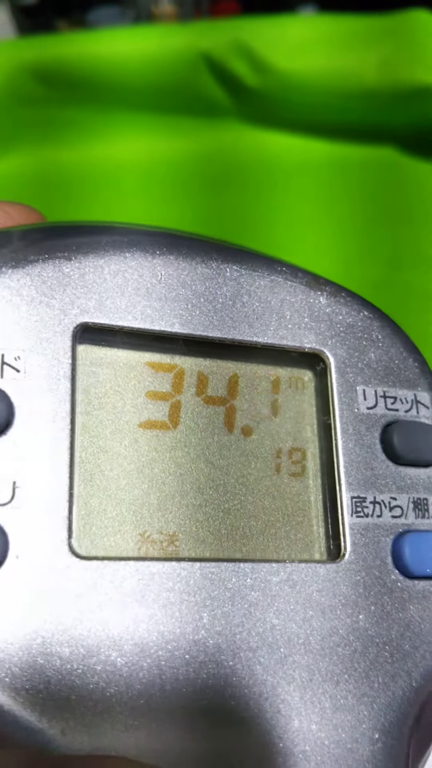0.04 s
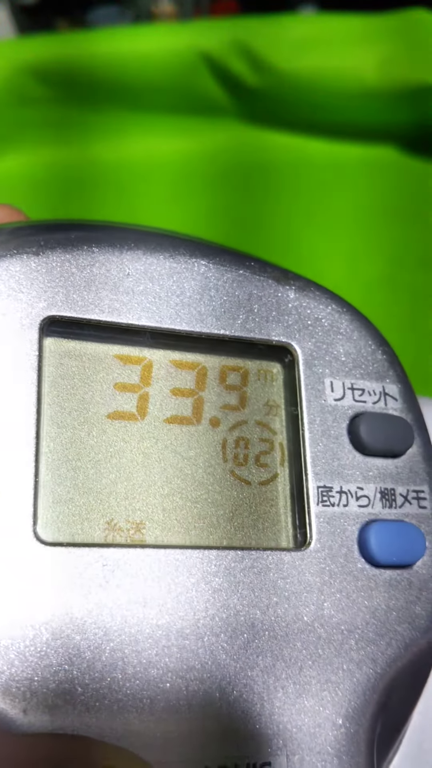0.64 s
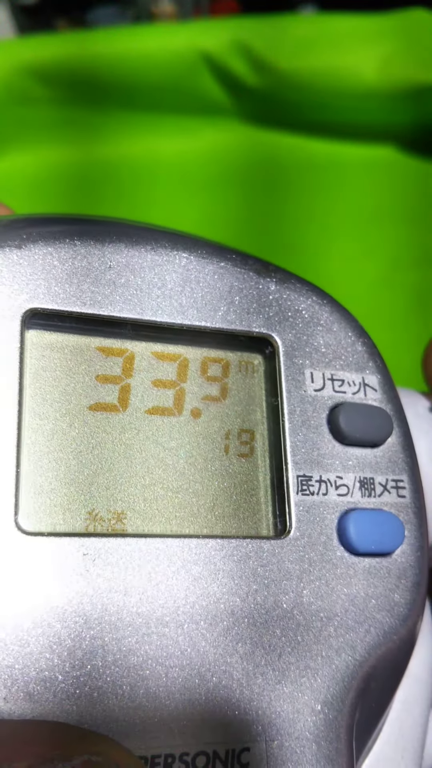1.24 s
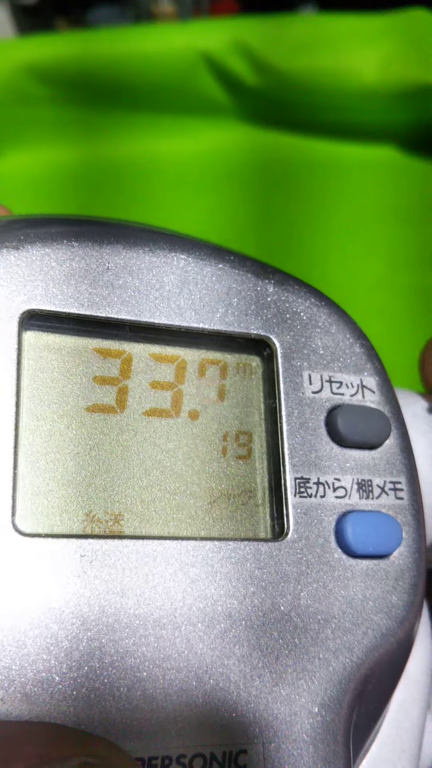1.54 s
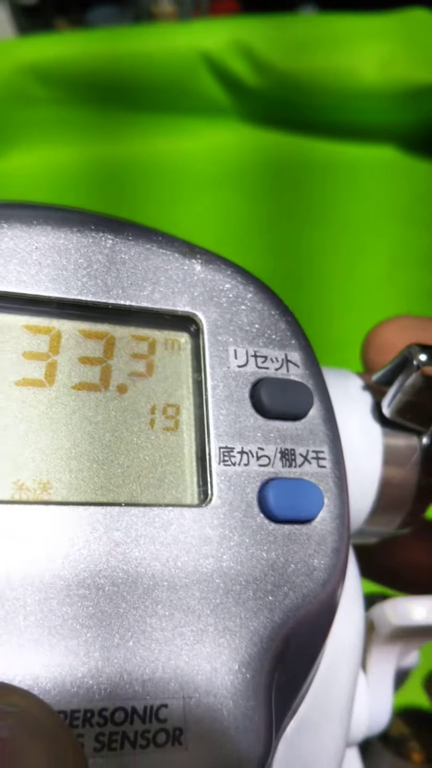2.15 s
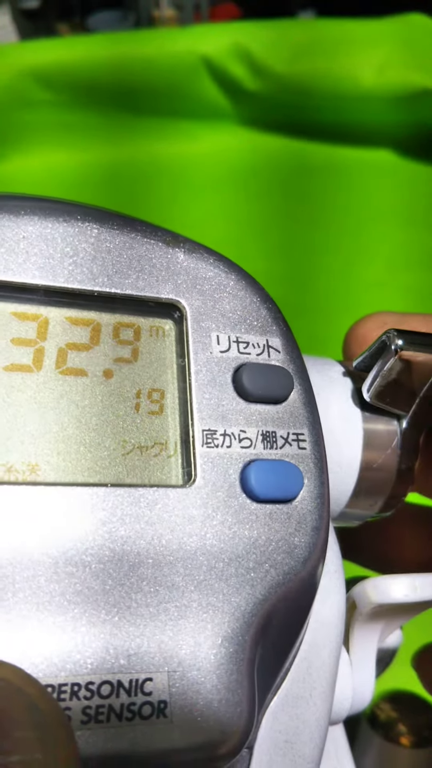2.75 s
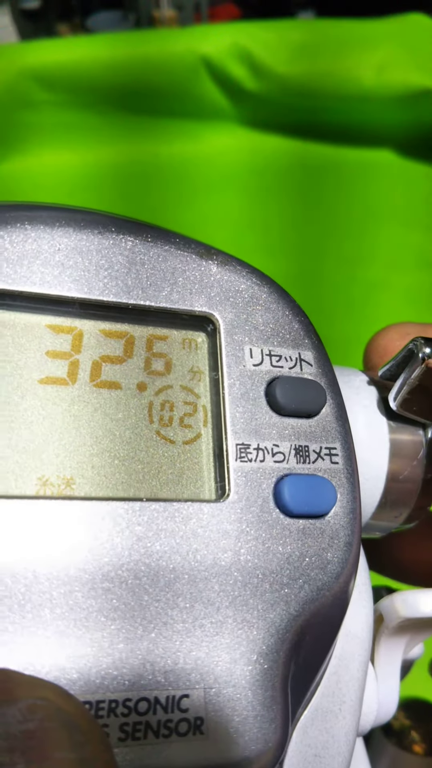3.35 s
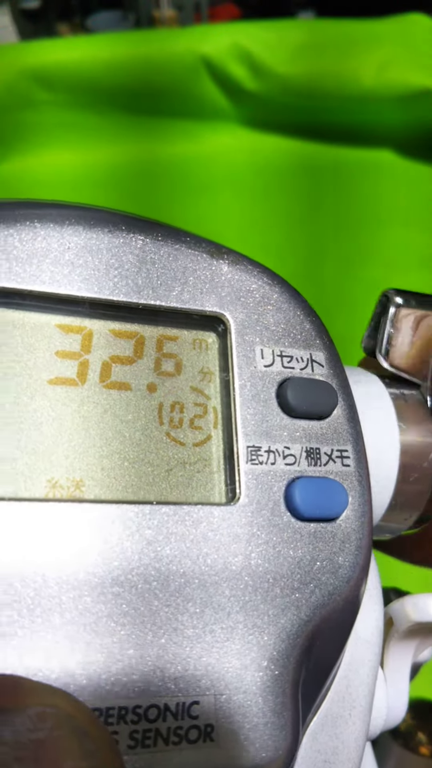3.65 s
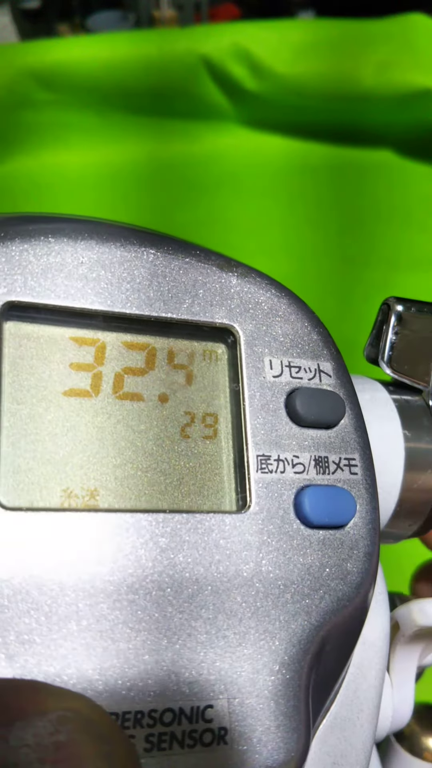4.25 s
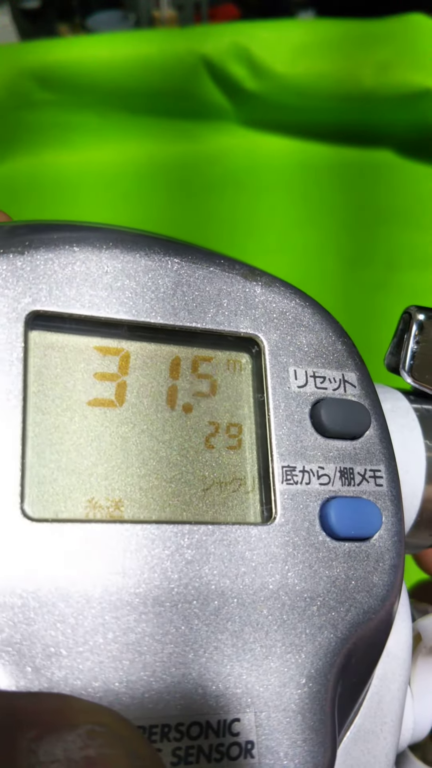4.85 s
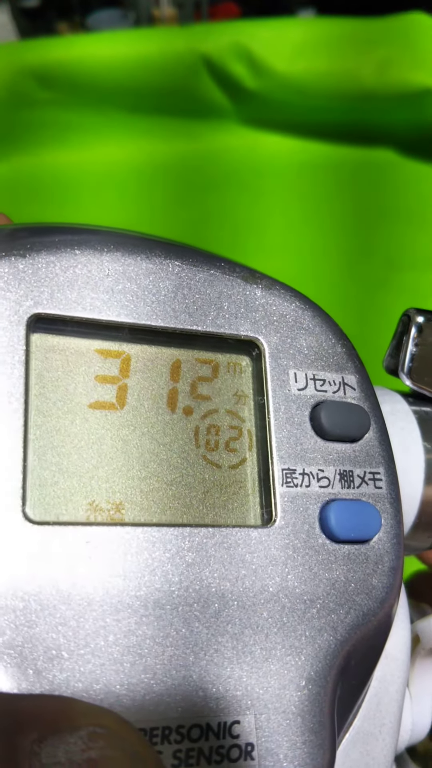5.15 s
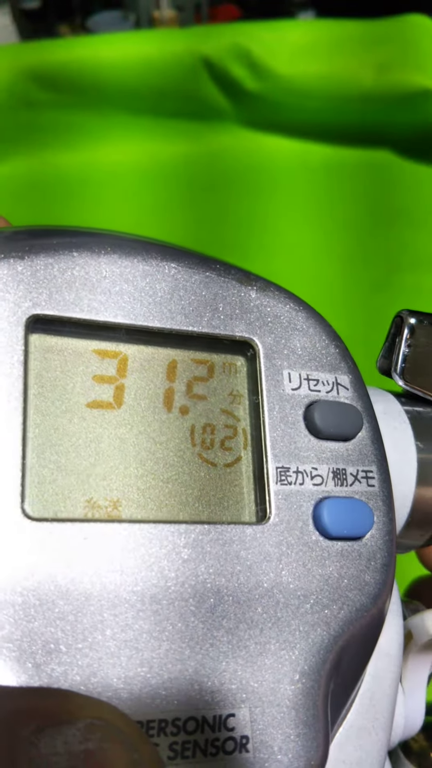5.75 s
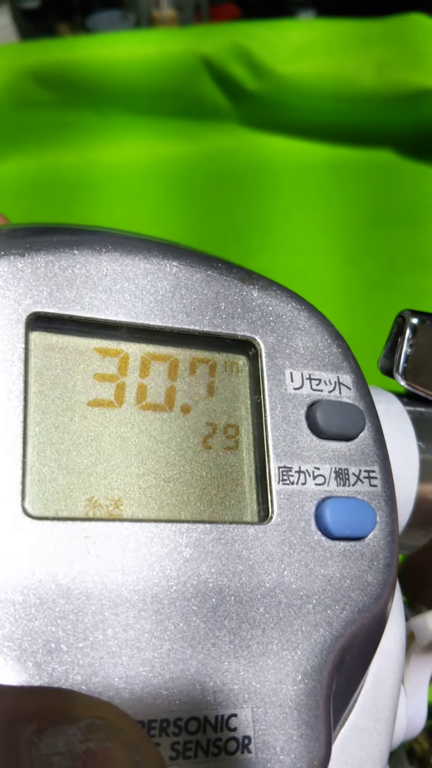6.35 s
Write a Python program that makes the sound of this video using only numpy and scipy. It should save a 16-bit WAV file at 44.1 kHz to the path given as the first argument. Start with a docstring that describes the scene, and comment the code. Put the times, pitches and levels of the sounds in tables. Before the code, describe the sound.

Close up, the motor of an electric fishing reel buzzes while its gears whine and rattle. It runs slowly twice, first briefly and then longer, and then twice at about double the speed, brighter and louder. Each restart clicks into mesh and rises quickly in pitch, and each stop winds down fast. Faint dull handling ticks and the low hum of a small room are heard in the pauses.

```python
"""Buzz, whine and rattle of an electric fishing reel, close up: four bursts of winding, two slow, two fast.
Chopped drive current makes the motor buzz; the gears whine, rattle in the housing and throb once per
spool turn. The first burst is already under way; at each later start the shaft spins up and steel parts
snap into mesh. Friction brakes the shaft after each stop. Behind it, the low hum of a small quiet room."""
import sys
import numpy as np
from scipy import signal
from scipy.fft import rfft, irfft
from scipy.io import wavfile
from scipy.ndimage import uniform_filter1d

SR = 44100
rng = np.random.default_rng(int(sys.argv[2]) if len(sys.argv) > 2 else 0)


def generate_wav(signal):
    """Clip the signal to [-1, 1] and save it as 16-bit WAV at the path in sys.argv[1]."""
    frames = np.transpose(np.atleast_2d(signal))
    scaled = np.clip(frames, -1, 1) * 32767
    pcm = np.round(scaled).astype(np.int16)
    wavfile.write(sys.argv[1], SR, pcm)


N = 291060
T = np.arange(N) / SR
GRID_HZ = np.arange(2049) * SR / 4096

# winding bursts: on t/s, off t/s, top shaft speed f/Hz, spin-up t/s, extra rattle level/dB
BURSTS = [(-1.5, 0.239, 114.5, .118, 2), (1.2166, 3.058, 114.5, .118, 0), (4.047, 4.944, 248.5, .093, 0),
          (5.932, 6.6, 251, .094, 0)]
# motor can and mount resonances: f/Hz, width/Hz, relative level/dB
CAN_MODES = [(527, 200, -15), (775, 130, -12.5), (1233, 108, -10.5), (1820, 210, -7), (2146, 206, 2),
             (2630, 560, -4.5), (4060, 1340, -17.5)]
# gear housing resonances: f/Hz, width/Hz, relative level/dB
HOUSING_MODES = [(790, 540, -20), (1353, 220, -13), (1982, 242, -4.5), (2323, 266, -0.5), (2783, 320, -0.5),
                 (3092, 270, 0), (3500, 670, -7), (4244, 260, -6.5), (4446, 350, 0), (5077, 437, -3.5),
                 (6583, 360, -11.5), (7900, 660, -13), (8960, 2440, -18), (11430, 490, -19),
                 (14500, 3600, -19.5)]
# motor tones: shaft multiple, full-speed level/dB, growth/(dB/octave), spin-up gain/dB, coast gain/dB
MOTOR_ORDERS = [(1, -52, 14.5, -4.5, -5), (3, -43.5, 17, 1, -5), (5.17, -65.5, -0.5, 10, -1),
                (9, -69.5, -5, 13, 9)]
# gear tooth tones: shaft multiple, full-speed level/dB
GEAR_ORDERS = [(7.5, -37.5), (8.07, -37.5), (8.5, -47), (9.17, -38), (9.5, -46), (12.85, -38),
               (18.5, -41.5), (18.67, -51.5)]
# resonances of small steel parts: f/Hz, width/Hz, relative level/dB
STEEL_MODES = [(2780, 1100, -3), (4290, 330, -20), (7610, 430, -7), (8880, 340, -6), (12450, 780, -7),
               (12920, 700, -1.5), (8500, 8000, -17.5)]
# steel snapping into mesh: t/s, level/dB, decay t/s, treble shelf/dB, further top shelf/dB
MESH_SNAPS = [(1.2217, -27, 0.0013, -10, -21), (1.2824, -22, 0.0012, -3, 9),
              (4.0669, -27.5, 0.0014, -8.5, 2), (4.08, -25, 0.00083, 1, -4.5),
              (5.9757, -14, 0.00087, 4, -18)]
# handling ticks: t/s, level/dB
CASE_TICKS = [(.558, -50), (3.4394, -51), (3.6963, -43), (5.6116, -59)]
# room noise spectrum: f/Hz, relative level/dB
NOISE_SPECTRUM = [(30, -21), (45, -17), (70, 4.5), (100, -2.5), (140, -1), (220, -9), (650, -18),
                  (950, -26), (2200, -34.5), (5000, -41), (6000, -52.5), (7800, -44.5), (14000, -36)]
# hum and faint electrical whistles: f/Hz, level/dB
HUM_TONES = [(56.9, -49), (119.8, -54.5), (375, -66.5), (468, -71.5), (2812, -83), (7628, -87)]

FULL_SPEED_HZ, CHOPPER_HZ, TURNS_PER_SPOOL = 245, 251.9, 6


def shaft_speed_hz(creep_share=.12, creep_slowdown=4, friction_hz_per_s=600, drag_per_s=1.7):
    """Current spins the shaft up, the last share slowly; dry friction and drag stop it."""
    speed_hz = np.zeros(N)
    for on_s, off_s, top_hz, spin_s, _ in BURSTS:
        age = np.clip(T - on_s, 0, off_s - on_s) / spin_s
        lag = (1 - creep_share) * np.exp(-age) + creep_share * np.exp(-age / creep_slowdown)
        driven_hz = top_hz * (1 - lag)
        braking = 1 - np.exp(-drag_per_s * np.maximum(T - off_s, 0))
        lost_hz = (driven_hz + friction_hz_per_s / drag_per_s) * braking
        speed_hz += np.maximum(driven_hz - lost_hz, 0)
    return speed_hz


def shaft_load(speed_hz):
    """Strain (driven shaft's lag behind top speed, over full speed) and coasting (1 with current off)."""
    lag_hz = sum(gate(on_s, off_s) * (top_hz - speed_hz) for on_s, off_s, top_hz, *_ in BURSTS)
    powered = sum(gate(on_s, off_s) for on_s, off_s, *_ in BURSTS)
    return lag_hz / FULL_SPEED_HZ, uniform_filter1d(1. - powered, size=1200)


def motor_buzz(turns, speed_hz, base_db=-33, throttle_db=-4, scatter_db=1.5,
               cogging=.042, jitter_s=35e-6, rebound=.75, rebound_s=.0008):
    """Each current pulse kicks the motor can, harder or softer with rotor angle."""
    force = np.zeros(N)
    for on_s, off_s, top_hz, *_ in BURSTS:
        times_s = np.arange(on_s, off_s, 1 / CHOPPER_HZ)
        late, size, bounce, gap = rng.standard_normal((1000, 4))[:len(times_s)].T
        rotor = 1 + cogging * np.cos(4 * np.pi * np.interp(times_s, T, turns))
        kicks = unit(rotor * undb(scatter_db * np.clip(size, -2, 2)))
        kicks *= undb(throttle_db * (2 * top_hz / FULL_SPEED_HZ - 1))
        kicks[0] = undb(3.5)  # first kick takes up the slack
        kicks *= undb(base_db) * np.sqrt(SR / CHOPPER_HZ / (1 + rebound ** 2))
        force += impulses(times_s + jitter_s * late, kicks)
        # pinion rebounds off a tooth flank
        force += impulses(times_s + rebound_s * np.exp(gap / 2), rebound * kicks * np.sign(bounce))
    # more current near stall, less near full speed
    current_db = 2.5 * np.exp(-speed_hz / 75) - 9 * np.clip(2 * speed_hz / FULL_SPEED_HZ - 1, 0, 1)
    return ring(force * undb(current_db), CAN_MODES)


def gear_rattle(turns, speed_hz, knocks_per_spool=432, repeat_share=.33, scatter_db=4,
                throb_db=1.18, mesh_db=3, kick_db=2, can_db=-6):
    """Tooth flanks knock in the housing; the pattern partly repeats each spool turn."""
    spool_turns = turns / TURNS_PER_SPOOL
    knocks = np.arange(int(spool_turns[-1] * knocks_per_spool))
    offset, flaw = rng.standard_normal((knocks_per_spool, 2))[knocks % knocks_per_spool].T
    chance, size = rng.standard_normal((len(knocks), 2)).T
    times_s = np.interp((knocks + offset / 2) / knocks_per_spool, spool_turns, T)
    scatter = chance * undb(scatter_db * (np.clip(size, -2, 2) - .5))
    force = impulses(times_s, np.sqrt(repeat_share) * flaw + np.sqrt(1 - repeat_share) * scatter)
    force *= np.sqrt(SR * TURNS_PER_SPOOL / knocks_per_spool / np.maximum(speed_hz, 10))
    slow = np.clip(2 - 2 * speed_hz / FULL_SPEED_HZ, 0, 1)
    # at low speed, current kicks shake the teeth through their backlash
    kick = sum(gate(on_s, off_s) * np.exp(-((T - on_s) * CHOPPER_HZ % 1) / .1)
               for on_s, off_s, *_ in BURSTS)
    press = np.cos(2 * np.pi * spool_turns)  # spool gear runs off centre
    mesh = np.cos(2 * np.pi * 22 * spool_turns)
    force *= undb(throb_db * press + slow * (mesh_db * mesh + kick_db * (kick - .05)) + .27 * drift(30))
    treble_db = 1.5 * press + 4 * drift(70) - 5 * slow
    housing = shelf(ring(force, HOUSING_MODES), 3700, treble_db)
    return housing + undb(can_db) * slow * ring(force * kick, CAN_MODES)


def rattle_gain(speed_hz, base_db=-23.5, db_per_octave=7.5, strain_db=2, coast_db=-1.5, knock_hz=57.4):
    """Teeth knock harder with speed and strain; below knock_hz they roll instead."""
    strain, coasting = shaft_load(speed_hz)
    pull = 27 / 4 * strain * (speed_hz / FULL_SPEED_HZ) ** 2
    level_db = base_db + db_per_octave * octaves(speed_hz) + strain_db * pull + coast_db * coasting
    level_db += sum(gate(on_s, off_s) * extra_db for on_s, off_s, *_, extra_db in BURSTS)
    return undb(level_db) * speed_hz ** 2 / (speed_hz ** 2 + knock_hz ** 2)


def whine(turns, speed_hz, full_strain=.38, fade_hz=80, pinion_multiple=11.18,
          gear_db_per_octave=7.5, gear_strain_db=-12.5, gear_coast_db=-4.5):
    """Motor tones track the shaft; gear and pinion tones swell as they sweep through resonances."""
    strain, coasting = shaft_load(speed_hz)
    pull, rise = np.clip(strain / full_strain, 0, 1), octaves(speed_hz)
    motor, gears = np.zeros((2, N))
    for multiple, db, db_per_octave, pull_db, coast_db in MOTOR_ORDERS:
        gain = undb(db + db_per_octave * rise + pull_db * pull + coast_db * coasting)
        motor += gain * shaft_tone(turns, multiple, flutter_db=1.2, wander=.16)
    housing = response(HOUSING_MODES, GRID_HZ)
    for multiple, db in GEAR_ORDERS:
        resonance = np.interp(multiple * speed_hz, GRID_HZ, housing)
        resonance /= np.interp(multiple * FULL_SPEED_HZ, GRID_HZ, housing)
        gain = resonance * undb(db + gear_db_per_octave * rise + gear_strain_db * pull)
        gears += gain * shaft_tone(turns, multiple, flutter_db=3, wander=.25)
    pinion_gain = response([(2400, 420, -28.5)], pinion_multiple * speed_hz) * speed_hz / FULL_SPEED_HZ
    gears += pinion_gain * shaft_tone(turns, pinion_multiple, flutter_db=1, wander=.16)
    return (motor + undb(gear_coast_db * coasting) * gears) * np.clip(speed_hz / fade_hz, 0, 1) ** 2


def shaft_tone(turns, multiple, flutter_db, wander):
    """Slightly unsteady sine locked to the shaft, rms near 1."""
    amplitude = np.sqrt(2) * undb(flutter_db * drift(25))
    return amplitude * np.sin(2 * np.pi * multiple * turns + wander * multiple / 10 * drift(50))


def spool_rub(turns, speed_hz, rub_db=-42, throb_db=3.5, ring_hz=8300, width_hz=450):
    """The spool rubs once a turn: thin metallic hiss, growing with speed."""
    press = np.cos(2 * np.pi * turns / TURNS_PER_SPOOL)
    hiss = ring(rng.standard_normal(N), [(ring_hz, width_hz, 0)])
    return hiss * undb(rub_db + throb_db * (press - 1)) * (speed_hz / FULL_SPEED_HZ) ** 2


def brushes(turns, speed_hz, level_db=-58, hiss_hz=13200, width_hz=1400, whistle_multiple=121):
    """Brushes sizzle on the commutator, with a thin whistle at low speed."""
    hiss = ring(rng.standard_normal(N), [(hiss_hz, width_hz, 0)])
    whistle = np.sin(2 * np.pi * whistle_multiple * turns + .8 * drift(120))
    whistle *= np.clip((SR / 2.5 - whistle_multiple * speed_hz) / 2000, 0, 1)  # anti-alias fade
    contact = np.clip(2 * speed_hz / FULL_SPEED_HZ, 0, 1) ** 3
    return undb(level_db) * contact * (hiss + whistle)


def mesh_snaps(rise_s=.00034, tail_db=-21, tail_s=.0065, treble_hz=6260, top_hz=12000):
    """Steel scrapes home within milliseconds and rings on faintly."""
    out = np.zeros(N)
    age_s = T[:SR // 8]
    for start_s, db, decay_s, treble_db, top_db in MESH_SNAPS:
        attack = 1 - np.exp(-age_s / rise_s)
        decay = np.exp(-age_s / decay_s) + undb(tail_db) * np.exp(-age_s / tail_s)
        snap = ring(attack * decay * rng.standard_normal(len(age_s)), STEEL_MODES)
        snap = shelf(shelf(snap, treble_hz, treble_db), top_hz, top_db)
        first = int(start_s * SR)
        out[first:first + len(snap)] += undb(db) * snap * np.sqrt(2 * decay_s * SR / np.sum(snap ** 2))
    return out


def case_ticks(decay_s=.0026, body_hz=1300, width_hz=2200):
    """The plastic case ticks dully in the hand."""
    envelope = sum(undb(db) * (T >= start_s) * np.exp(-np.abs(T - start_s) / decay_s)
                   for start_s, db in CASE_TICKS)
    return ring(envelope * rng.standard_normal(N) / 2, [(body_hz, width_hz, 0)])


def room_tail(x, level_db=-13.5, t60_s=.45, delay_s=.004):
    """Short diffuse tail from nearby walls."""
    age_s = T[:SR // 2]
    tail = rng.standard_normal(len(age_s)) * undb(-60 * age_s / t60_s) * (age_s > delay_s)
    return undb(level_db) * signal.fftconvolve(x, tail / np.linalg.norm(tail))[:N]


def background(noise_db=-48.5, waver_db=2, wander_rad=.46):
    """Room rumble and hiss, wavering hum, faint electrical whistles."""
    points_hz, points_db = np.transpose(NOISE_SPECTRUM)
    bins_hz = np.maximum(np.arange(N // 2 + 1) * SR / N, 1)
    spectrum = undb(np.interp(np.log(bins_hz), np.log(points_hz), points_db))
    noise = irfft(rfft(rng.standard_normal(N)) * spectrum, N)
    hum = sum(undb(db + waver_db * drift(5.9)) * np.sin(2 * np.pi * hz * T + wander_rad * drift(3.43))
              for hz, db in HUM_TONES)
    return undb(noise_db) * unit(noise) + np.sqrt(2) * hum


def stereo_side(x, edge_hz=5900, side_db=-10.5):
    """Left-right difference, treble only."""
    highpass = signal.butter(8, edge_hz, "high", fs=SR, output="sos")
    scattered = signal.sosfilt(highpass, x) * unit(np.tanh(4 * drift(900)))
    return undb(side_db) * signal.sosfilt(highpass, scattered)


def undb(db):
    """Decibels to gain."""
    return np.exp(np.asarray(db) * np.log(10) / 20)


def unit(x):
    """Scale to rms 1."""
    return x / np.sqrt(np.mean(x ** 2))


def gate(on_s, off_s):
    """True from on_s to off_s."""
    return (T >= on_s) & (T < off_s)


def octaves(speed_hz):
    """Octaves relative to full speed."""
    return np.log2(np.maximum(speed_hz, 1e-3) / FULL_SPEED_HZ)


def drift(rate_hz):
    """Smooth random drift, spread near 1."""
    hold = int(SR / rate_hz)
    steps = np.repeat(rng.standard_normal(N // hold + 1), hold)
    return .73 * uniform_filter1d(uniform_filter1d(steps, hold), hold)[:N]


def impulses(times_s, sizes):
    """Train of one-sample impulses."""
    inside = (times_s >= 0) & (times_s < N / SR)
    return np.bincount(np.round(times_s[inside] * SR).astype(int), sizes[inside], N + 1)[:N]


def response(modes, hz):
    """Gain at hz of steep resonances (f/Hz, width/Hz, level/dB)."""
    return np.sqrt(sum(undb(2 * db) / (1 + ((hz - centre_hz) / width_hz) ** 2) ** 3
                       for centre_hz, width_hz, db in modes))


def ring(x, modes):
    """Ring x through resonances: minimum phase, unit-energy impulse response."""
    cepstrum = irfft(np.log(response(modes, GRID_HZ) + 1e-4))
    half = len(cepstrum) // 2
    cepstrum[1:half] *= 2
    cepstrum[half + 1:] = 0
    impulse = irfft(np.exp(rfft(cepstrum)))[:half]
    return signal.fftconvolve(x, impulse / np.linalg.norm(impulse))[:N]


def shelf(x, edge_hz, gain_db):
    """Treble shelf."""
    high = signal.sosfiltfilt(signal.butter(2, edge_hz, "high", fs=SR, output="sos"), x)
    return x + (undb(gain_db) - 1) * high


def scene():
    """One shaft drives gears, buzz and brushes; snaps, ticks and the room join them."""
    speed_hz = shaft_speed_hz()
    turns = np.cumsum(speed_hz + 1e-6) / SR  # strictly rising, for interpolation
    reel = rattle_gain(speed_hz) * gear_rattle(turns, speed_hz)
    reel += whine(turns, speed_hz) + spool_rub(turns, speed_hz)
    reel += motor_buzz(turns, speed_hz) + brushes(turns, speed_hz)
    reel += mesh_snaps() + case_ticks()
    mid = reel + room_tail(reel) + background()
    side = stereo_side(mid)
    return np.array([mid + side, mid - side])


def record(dry, cutoff_hz=14280):
    """The phone cuts the top steeply."""
    return signal.sosfilt(signal.ellip(12, .1, 80, cutoff_hz, fs=SR, output="sos"), dry)


dry = scene()
out = record(dry)
generate_wav(out)
```